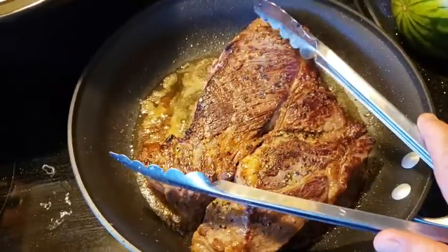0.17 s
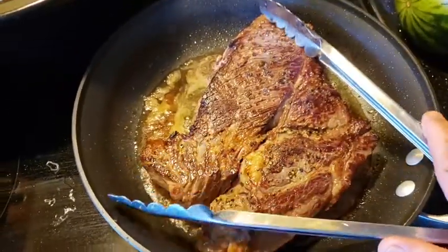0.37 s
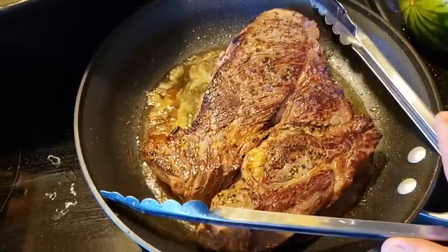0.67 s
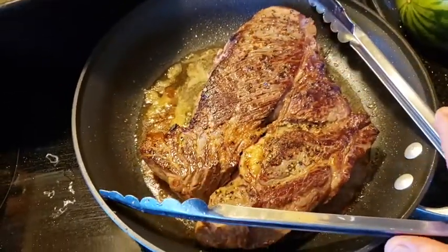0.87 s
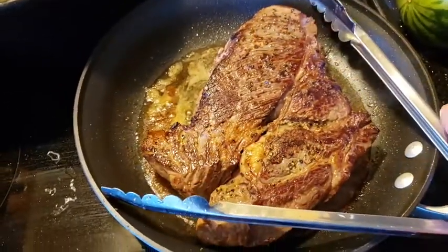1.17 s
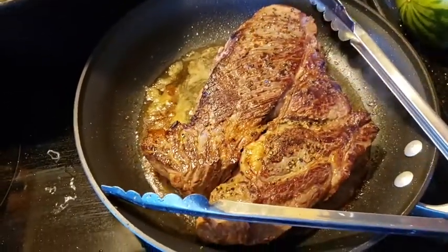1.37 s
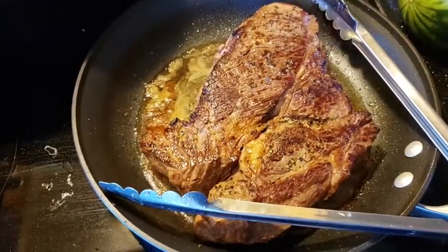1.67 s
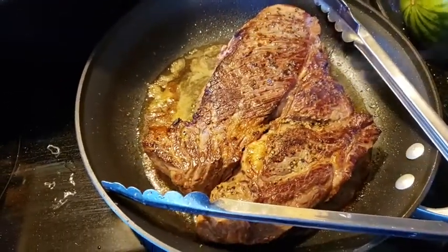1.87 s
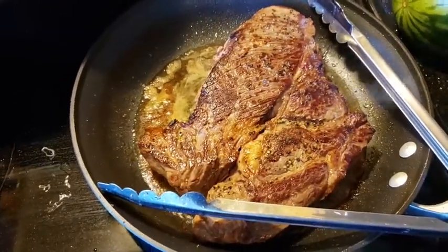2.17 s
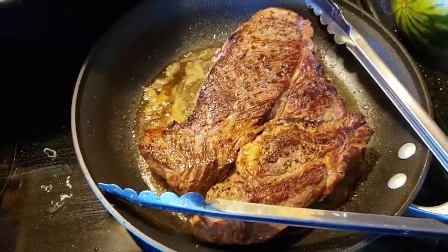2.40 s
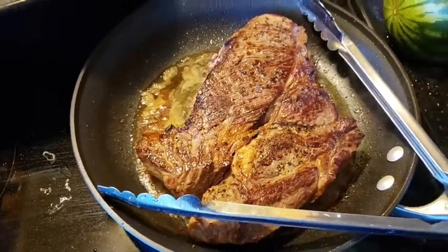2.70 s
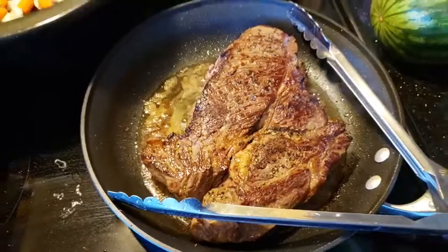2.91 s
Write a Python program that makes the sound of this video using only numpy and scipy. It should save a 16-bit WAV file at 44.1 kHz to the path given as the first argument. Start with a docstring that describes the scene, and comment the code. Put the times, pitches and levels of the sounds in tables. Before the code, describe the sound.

Meat fries in a pan with a constant close hiss and crackle of bubbling fat. Tongs click and rub softly near the start, then a dull pop sounds and the sizzle grows slightly, over a faint low kitchen rumble.

```python
"""A steak sizzles in oil and butter in a frying pan, heard from close above in a small kitchen.
Countless tiny steam bubbles burst as a fizz, droplets crackle, and larger bubbles ring briefly.
Now and then the fat spits, a dull pop sounds, or the meat settles with a soft bump.
Steel tongs tick, rub and knock against the pan. A low rumble with soft thumps lies underneath."""
import sys
import numpy as np
from scipy import signal
from scipy.io import wavfile

SR = 44100
rng = np.random.default_rng(int(sys.argv[2]) if len(sys.argv) > 2 else 0)


def wrap_up_sound(samples):
    """Save the sound to the file named by the first command line argument, as 16-bit audio."""
    columns = np.atleast_2d(samples).T
    # keep every value between -1 and 1, then stretch to whole-number steps
    tamed = np.clip(columns, -1, 1)
    steps = np.round(tamed * 32767).astype(np.int16)
    wavfile.write(sys.argv[1], SR, steps)


N = 134505
TIME = np.arange(N) / SR

# How hard the steak sizzles: time_s, low_db, middle_db, treble_db
VIGOUR = [(0.1, -33, -31, -31.5), (0.3, -34.5, -32, -33.5), (0.55, -33.5, -32, -32.5),
          (0.8, -33.5, -30.5, -34), (1.1, -33.5, -30.5, -31.5), (1.4, -34, -28, -30),
          (1.6, -31.5, -27, -30), (1.8, -31.5, -27.5, -30), (2.02, -31, -28.0, -29),
          (2.2, -31.5, -29.0, -28), (2.4, -30.5, -27.5, -28.5), (2.58, -32, -27, -30), (2.8, -32, -29, -32),
          (3.0, -32.5, -31.5, -31.5)]
# Where low, middle and treble lie: pitch_hz
REGISTER_HZ = [2200, 5000, 10500]
# Tone of the fizz: pitch_hz, relative_db
FIZZ_TONE = [(200, -28), (450, -22.5), (880, -16.5), (1100, -9.5), (1500, -4), (1900, -3.5), (2450, 0.1),
             (3400, -0.4), (5200, -0.5), (6500, -3), (8200, -7.5), (12000, -5.5), (16000, -6)]
# How alike left and right are (1 is the same, 0 is unrelated): pitch_hz, likeness
LIKENESS = [(40, -0.002), (110, 0.67), (300, 0.71), (800, 0.91), (1500, 0.28), (2500, -0.014), (3600, -0.4),
            (4600, -0.25), (5800, 0.12), (9000, -0.043), (15000, .1)]
# Lean by pitch (a lean is how much louder left is than right): pitch_hz, lean_db
BALANCE = [(40, 4), (120, 1.5), (400, -0.5), (1500, 0.5), (2000, -1.5), (2800, 0), (4500, 1.7), (5600, 2.5),
           (7300, 13.5), (9200, -6), (12000, -0.5), (15000, 1)]
# The sizzle is heard drifting slightly from left to right: time_s, lean_db
SIZZLE_LEAN = [(0, 0.7), (.6, 0.8), (1.3, 1.1), (2.1, -0.4), (3.0, -1.2)]
# Large bubbles in the butter: start_s, level_db, pitch_hz
BIG_BUBBLES = [(.228, -21, 5380), (.521, -23, 2400), (.664, -20, 5900), (.996, -20, 2300),
               (1.203, -21, 4900), (1.624, -29, 2800), (1.650, -20, 5600), (1.808, -20, 2550),
               (2.58, -21, 4800), (2.545, -18, 3100), (2.553, -17.5, 2930), (2.665, -16.5, 2420),
               (2.694, -20.5, 2400), (2.749, -25, 2300), (2.84, -21, 2300), (2.886, -18.5, 2200),
               (2.911, -20, 2400), (2.939, -22, 2500), (3.011, -21.5, 2700)]
# Tone of the rumble: pitch_hz, relative_db
RUMBLE_TONE = [(22, -27), (38, -8), (55, 2), (85, -8), (120, -8), (170, -16.5), (230, -20.5), (500, -25),
               (1000, -25)]
# Dull pops: start_s, level_db
POPS = [(0.025, -16), (.0333, -20), (1.5408, -2), (1.5435, -13), (1.678, -25), (2.054, -23), (2.068, -23),
        (2.908, -25)]
# Notes in a pop (a fade is the time to drop 60 dB): pitch_hz, relative_db, fade_s
POP_NOTES = [(125, -28, .07), (275, -22, .06), (520, -16.5, .013), (700, -9, .003), (1080, -15, .014),
             (1750, -9, 0.0037)]
# Ticks of spitting fat and tong tips: start_s, level_db, pitch_hz, lean_db
TICKS = [(0.0251, -8, 7000, 2), (.0255, -1, 1500, 8), (.0315, -3, 8000, 0), (0.0344, 4.5, 12800, -3),
         (.049, -1.5, 11000, -8), (.5246, -5, 5000, 3), (0.624, -7, 12000, -6), (.636, -3.5, 12500, 0),
         (0.874, -5, 8500, 0), (.974, -9, 10000, 3), (1.0032, -11, 6400, 4), (1.2067, -2, 5000, 5),
         (1.2562, -10, 8000, 8), (1.443, -5, 12000, 6), (1.4482, 1.5, 14500, 8), (1.455, -12, 9000, 2),
         (1.75, -7, 8000, 4), (2.0536, 2, 3000, 4), (2.5768, -7, 4400, 2), (2.9077, 1, 2500, -3),
         (2.9671, -7, 12000, -3)]
# Tongs rub on meat and pan: peak_s, level_db, half_length_s, low_hz, high_hz
RUBS = [(.058, -31, .02, 10000, 15500), (0.63, -26, 0.017, 9000, 15600), (.648, -25.5, .026, 1040, 1750),
        (0.875, -29, .016, 6000, 13000), (2.068, -22, 0.016, 1100, 3000)]
# Brief swells of the rumble: peak_s, level_db, pitch_hz, half_length_s
THUMPS = [(.286, -24, 60, 0.013), (1.52, -41, 125, .035), (1.86, -40, 105, 0.022), (2.64, -40, 120, 0.032),
          (2.701, -33, 75, 0.018), (2.745, -38, 150, .02), (2.906, -31, 69, 0.013), (3.015, -35, 105, .015)]
# Tongs knock on the pan: start_s, level_db, lean_db
KNOCKS = [(0.3654, -23, 1), (0.3686, -23, -1), (0.3747, -24, 11), (.381, -30.5, 0), (.634, -34.5, 10)]
# Notes of the struck pan: pitch_hz, relative_db, fade_s
PAN_NOTES = [(120, -8, 0.12), (287.4, -17, 0.15), (579, -16, 0.14), (692, -17, 0.1), (1041, -9, 0.1),
             (1183, -5, 0.05), (1400, -0.5, 0.067), (1550, -4, 0.064), (2050, -6, 0.087),
             (2646, -10, 0.096), (3280, -9, .07), (4833, -3, 0.05), (5480, 0, .04), (7300, -1.5, 0.025)]
# The meat settles: start_s, level_db
BUMPS = [(.620, -26), (0.646, -18)]

FIZZ_DB, CRACKLE_DB, BUBBLE_DB, RUMBLE_DB = -27, -36.5, -36.5, -45.5
CUTOFF_HZ = 15800


def from_db(db):
    """Turn decibels into a number to multiply by."""
    return 10 ** (np.asarray(db) / 20)


def rms_one(x):
    """Scale a sound so its average strength (rms) is 1."""
    return x / np.sqrt(np.mean(x ** 2) + 1e-20)


def at_hz(table, hz):
    """Read a table between its pitches, with octaves evenly spaced."""
    pitches, values = np.transpose(table)
    return np.interp(np.log(hz), np.log(pitches), values)


def lean(db):
    """Share a sound between left and right, keeping its total power."""
    return rms_one(from_db(np.array([[db], [-db]]) / 2))


def noise():
    """Separate hiss for left and right."""
    return rng.standard_normal((2, N))


def band(x, low_hz, high_hz, order=2):
    """Keep the sound between two pitches."""
    sections = signal.butter(order, [low_hz, min(high_hz, .48 * SR)], "band", fs=SR, output="sos")
    return signal.sosfilt(sections, x + 1e-18)


def drift(rate_hz):
    """A smooth random wobble, about 1 in size."""
    step, run_in = 40, 2000
    hold = np.exp(-2 * np.pi * rate_hz * step / SR)
    jitter = rng.standard_normal(N // step + run_in + 2)
    slow = signal.lfilter([1], [1, -2 * hold, hold * hold], jitter)[run_in:]
    return np.interp(np.arange(N) / step, np.arange(len(slow)), rms_one(slow))


def decay(start_s, fade_s):
    """A level that jumps to 1 and dies away."""
    return (TIME >= start_s) * from_db(-60 * np.clip((TIME - start_s) / fade_s, 0, 4))


def swell(peak_s, half_length_s):
    """A level that rises smoothly to 1 and falls again."""
    return np.exp(-((TIME - peak_s) / half_length_s) ** 2)


def ring(clicks, hz, fade_s):
    """Each click starts a fading note."""
    hold, turn = from_db(-60 / (fade_s * SR)), 2 * np.pi * hz / SR
    return signal.lfilter([0, np.sin(turn)], [1, -2 * hold * np.cos(turn), hold * hold], clicks + 1e-18)


def grains(per_s, spread_db):
    """Two rows of random clicks, many small and a few large."""
    sizes = from_db(spread_db * np.minimum(rng.exponential(1, (2, N)), 4.5))
    return sizes * rng.choice([-1, 1], (2, N)) * (rng.random((2, N)) < per_s / SR)


def vigour_db(hz):
    """How far the sizzle is above or below its average level at this pitch."""
    times, *levels = np.transpose(VIGOUR)
    shares = [np.interp(np.log(hz), np.log(REGISTER_HZ), row) for row in np.eye(len(levels))]
    level = np.interp(TIME, times, np.dot(shares, levels))
    return level - level.mean()


def stereo_band(pair, low, high):
    """Blend one band of two unrelated sounds into left and right."""
    hz = np.sqrt(low * high)
    padded = np.hstack([pair[:, -SR // 10:], pair])  # lets the filter settle first
    mid, side = band(padded, low, high, order=3)[:, -N:]
    alike = at_hz(LIKENESS, hz)
    blend = np.sqrt(1 + alike) * mid + np.sqrt(1 - alike) * side * [[1], [-1]]
    return lean(at_hz(BALANCE, hz)) * blend


def fizz(burst_share=0.53):
    """Thousands of tiny steam bubbles burst each second, merging into a hiss that surges and flickers."""
    layers = []
    for _ in range(2):
        bursts = rms_one(grains(per_s=9000, spread_db=3.5))
        layers.append(np.sqrt(burst_share) * bursts + np.sqrt(1 - burst_share) * noise())
    edges_hz = np.r_[200, 320, 500, 700, np.geomspace(950, 16500, 17)]
    out, surge_db = 0, 0.47 * drift(rate_hz=19)
    for k, (low, high) in enumerate(zip(edges_hz, edges_hz[1:])):
        hz = np.sqrt(low * high)
        flicker_db = 1.5 * drift(rate_hz=28.5)
        level = at_hz(FIZZ_TONE, hz) + vigour_db(hz) + surge_db + flicker_db
        out += from_db(level) * stereo_band(layers[k % 2], low, high)
    return from_db(FIZZ_DB) * rms_one(out)


def crackle(low_hz=3200):
    """Single droplets burst as bright clicks above the fizz."""
    clicks = band(grains(per_s=300, spread_db=3.6), low_hz, CUTOFF_HZ, order=1)
    return from_db(CRACKLE_DB + vigour_db(REGISTER_HZ[1])) * rms_one(band(clicks, low_hz / 2, CUTOFF_HZ))


def bubbles(low_hz=2008, high_hz=6490, notes=20, fade_cycles=27):
    """Bubbles in the butter ring briefly; some big ones stand out."""
    clicks = grains(per_s=300, spread_db=3.5)
    chosen_note = rng.integers(0, notes, N)
    small = sum(lean(at_hz(BALANCE, hz)) * ring(clicks * (chosen_note == k), hz, fade_cycles / hz)
                for k, hz in enumerate(np.geomspace(low_hz, high_hz, notes)))
    small = rms_one(band(small, low_hz / 2, CUTOFF_HZ))
    small *= from_db(BUBBLE_DB + 1.4 * vigour_db(REGISTER_HZ[0]))
    big = sum(from_db(db) * decay(s, fade_s=0.013) * np.sin(2 * np.pi * hz * (TIME - s))
              for s, db, hz in BIG_BUBBLES)
    return small + band(big, low_hz / 2, CUTOFF_HZ)


def rumble(flicker_db=2.5):
    """The uneven low noise of the kitchen."""
    out, edges_hz = 0, np.geomspace(20, 900, 12)
    for low, high in zip(edges_hz, edges_hz[1:]):
        level = at_hz(RUMBLE_TONE, np.sqrt(low * high)) + flicker_db * drift(rate_hz=4.3)
        out += from_db(level) * stereo_band(noise(), low, high)
    return from_db(RUMBLE_DB) * rms_one(out)


def dull_pops():
    """Dull pops with a brief low ring, probably the pan rocking on the stove."""
    clicks = np.zeros(N)
    for s, db in POPS:
        clicks[int(s * SR)] = from_db(db)
    body = sum(from_db(db) * ring(clicks, hz, fade_s) for hz, db, fade_s in POP_NOTES)
    tail = noise() * sum(from_db(db - 17.5) * decay(s, fade_s=.07) for s, db in POPS)
    return band(body, 190, CUTOFF_HZ) + stereo_band(tail, 380, 2400)


def ticks(spray_db=-17, width=1.7):
    """Fat spits or a tong tip taps: one sharp crack, then a short spray."""
    out, size = np.zeros((2, N + SR)), SR // 8
    for s, db, hz, lean_db in TICKS:
        burst = from_db(spray_db) * rng.standard_normal((2, size)) * decay(0, fade_s=.04)[:size]
        burst[:, 0] = 1  # the crack
        tick = band(burst, hz / width, hz * width, order=1)
        start = int(s * SR)
        out[:, start:start + size] += from_db(db) * lean(lean_db) * tick
    return out[:, :N]


def tong_rubs():
    """The tong tips slide a little, making a soft swell of scraping noise."""
    return sum(from_db(db) * swell(s, half_length_s) * band(noise(), low, high)
               for s, db, half_length_s, low, high in RUBS)


def thumps():
    """Soft, low notes come and go quickly, out of step between left and right."""
    offset_rad = np.array([[.75], [-.75]])
    return sum(from_db(db) * swell(s, half_length_s) * np.sin(2 * np.pi * hz * (TIME - s) + offset_rad)
               for s, db, hz, half_length_s in THUMPS)


def tong_knocks():
    """The tongs bounce on the pan: each touch scuffs it and sets all its notes ringing."""
    scuff = sum(from_db(db + 0.5) * lean(lean_db) * decay(s, fade_s=0.053) for s, db, lean_db in KNOCKS)
    out = band(scuff * noise(), 1200, 9000, order=1)
    for k, (hz, note_db, fade_s) in enumerate(PAN_NOTES):
        clicks = np.zeros((2, N))
        for s, db, lean_db in KNOCKS:
            clicks[:, [int(s * SR)]] = lean(lean_db) * from_db(db + note_db + rng.normal(0, 1, (2, 1)))
        out += (-1) ** k * ring(clicks, hz, fade_s)  # every other note swings the opposite way
    return out


def meat_bumps():
    """The meat is let go and sinks into the fat with a soft bump."""
    push = sum(from_db(db) * decay(s, fade_s=0.13) for s, db in BUMPS)
    return band(push * rng.standard_normal(N), 110, 220, order=1)


def kitchen(x, echo_db=-8):
    """Add the room's short wash of echoes, different at each ear."""
    tail = (noise() * decay(start_s=0.0034, fade_s=0.27))[:, :SR // 2]
    tail /= np.sqrt(np.sum(tail ** 2, axis=1, keepdims=True))
    return x + from_db(echo_db) * signal.fftconvolve(x, tail, axes=1)[:, :N]


def scene():
    """The sizzling pan and the tongs in the kitchen, over the rumble."""
    lean_db = np.interp(TIME, *np.transpose(SIZZLE_LEAN))
    sizzle = fizz() + kitchen(crackle() + bubbles())
    sizzle *= from_db(np.array([lean_db, -lean_db]) / 2)
    hits = kitchen(ticks() + tong_knocks())
    return sizzle + hits + tong_rubs() + dull_pops() + meat_bumps() + rumble() + thumps()


def record(dry):
    """Cut away the very highest treble."""
    return signal.sosfilt(signal.ellip(12, .1, 80, CUTOFF_HZ, fs=SR, output="sos"), dry)


dry = scene()
out = record(dry)
wrap_up_sound(out)
```